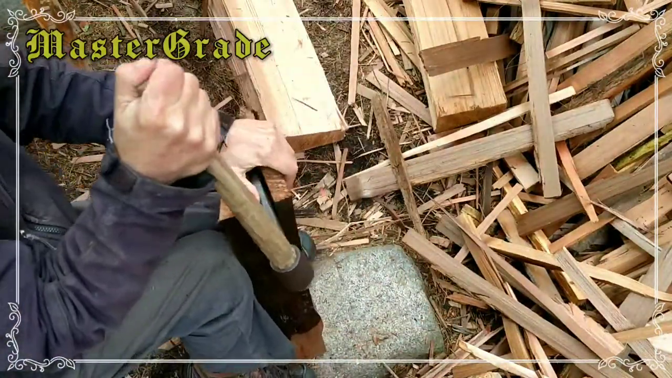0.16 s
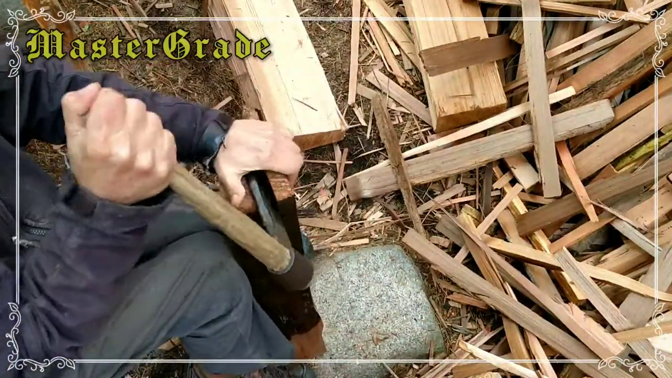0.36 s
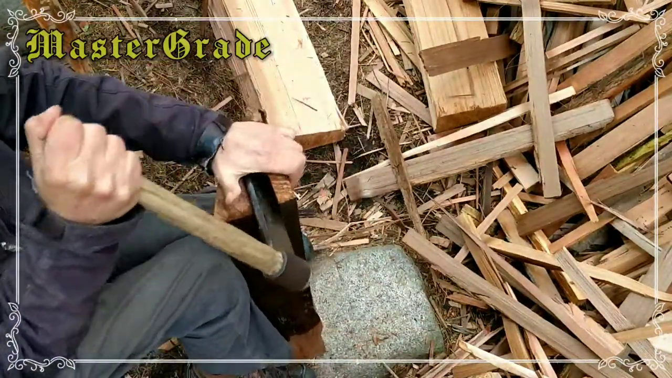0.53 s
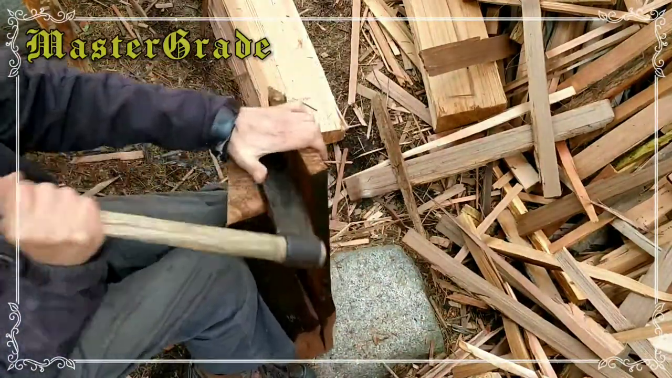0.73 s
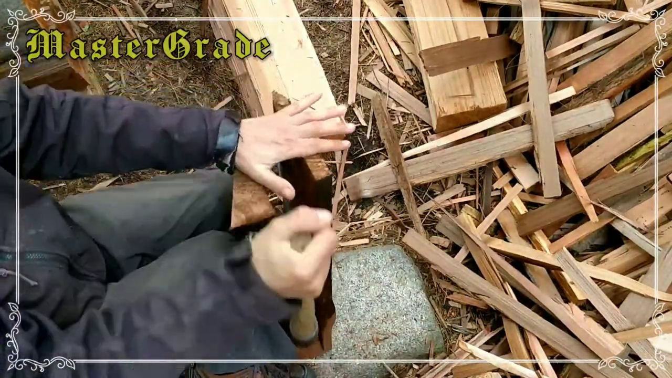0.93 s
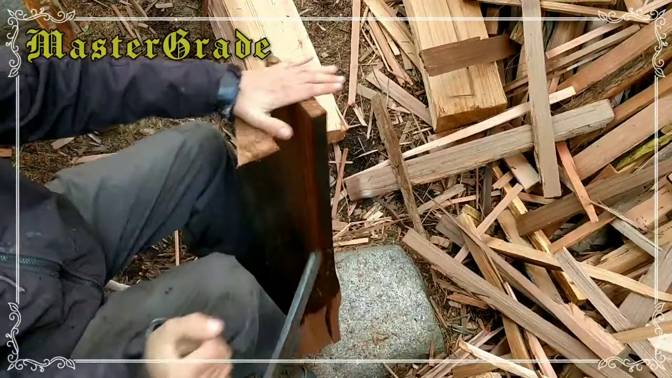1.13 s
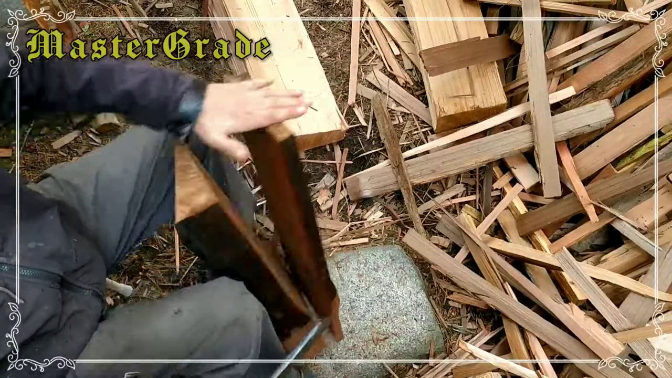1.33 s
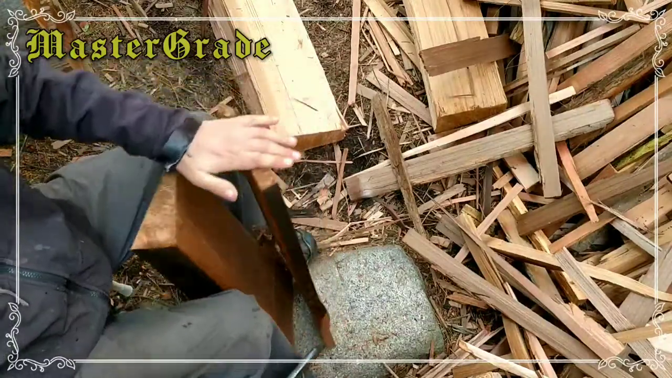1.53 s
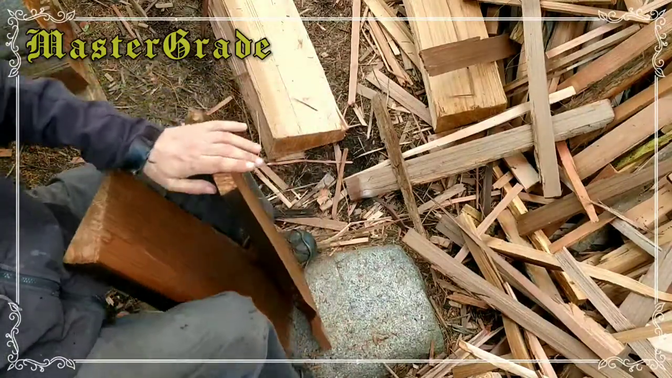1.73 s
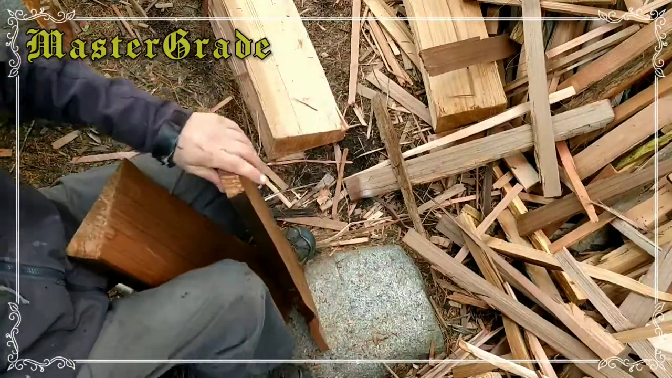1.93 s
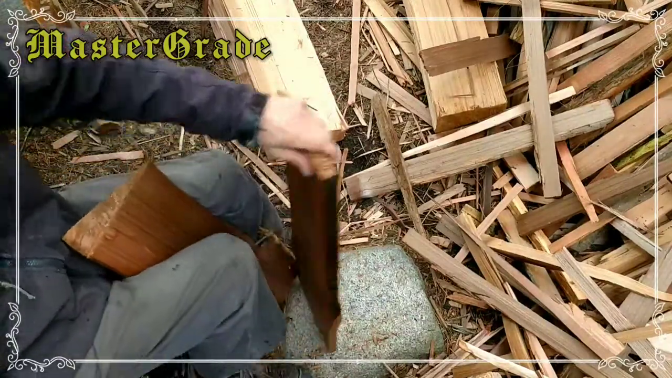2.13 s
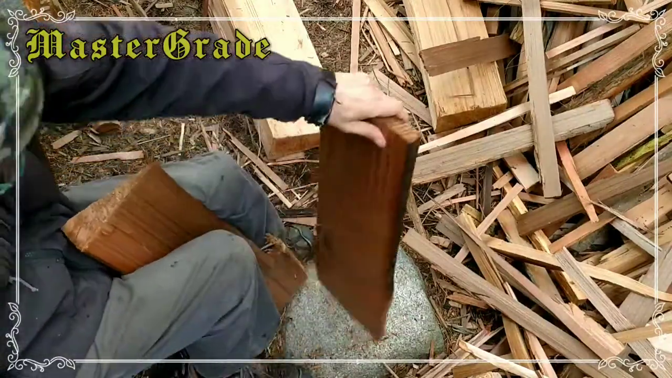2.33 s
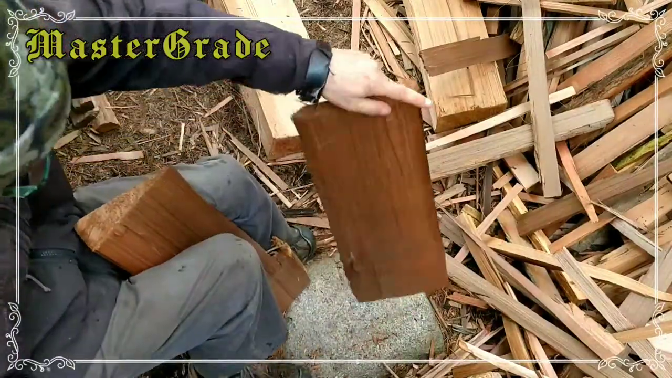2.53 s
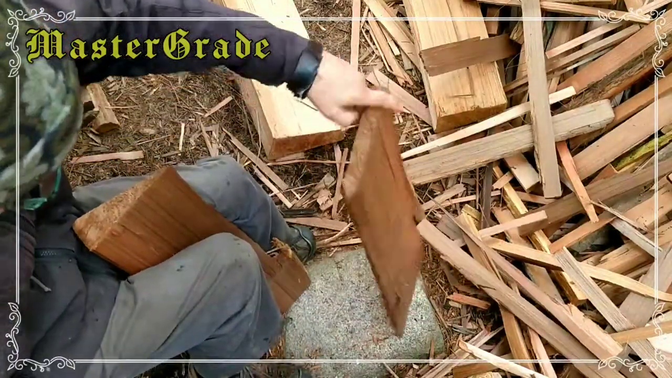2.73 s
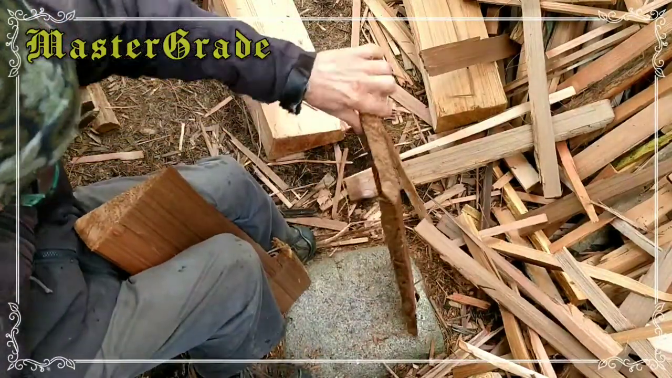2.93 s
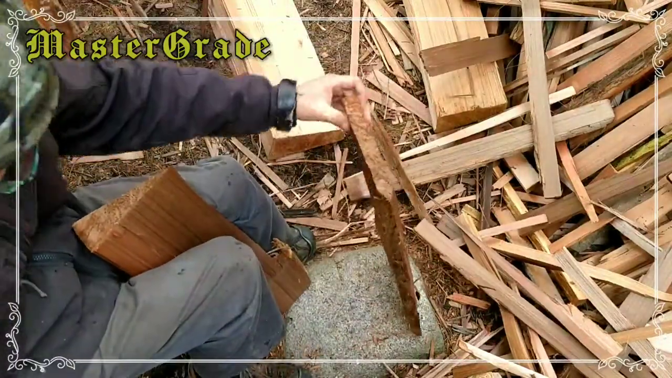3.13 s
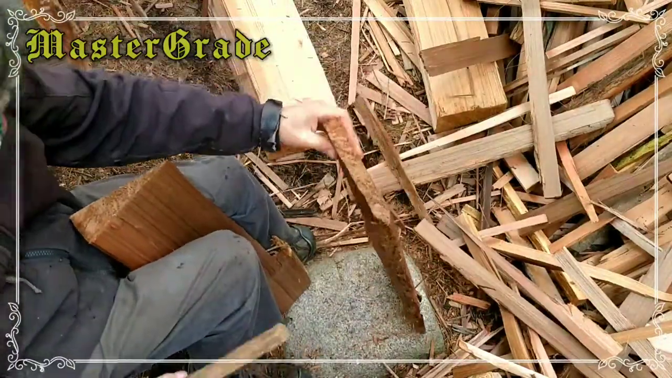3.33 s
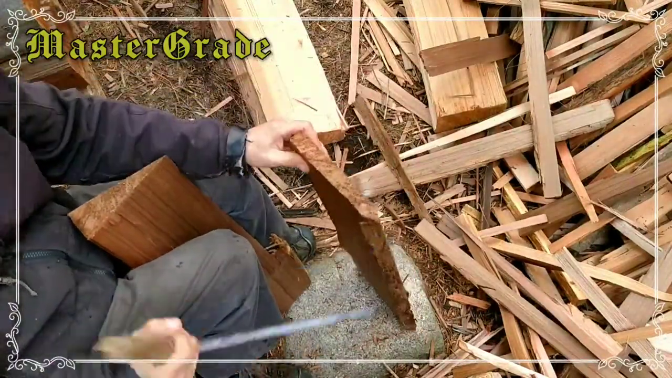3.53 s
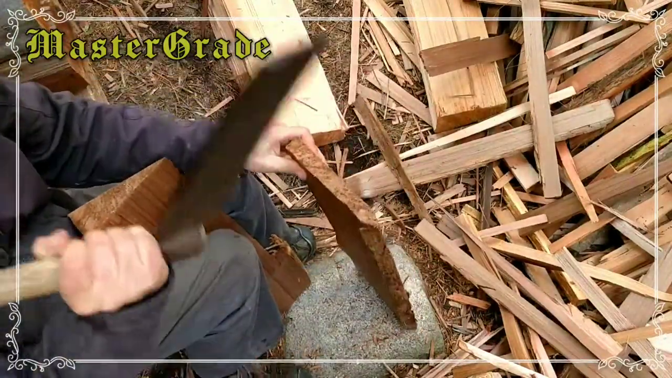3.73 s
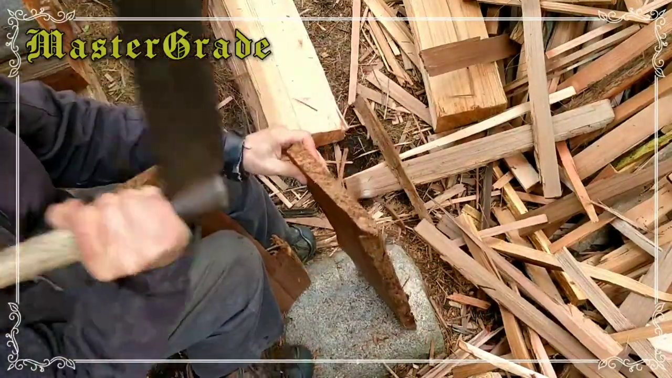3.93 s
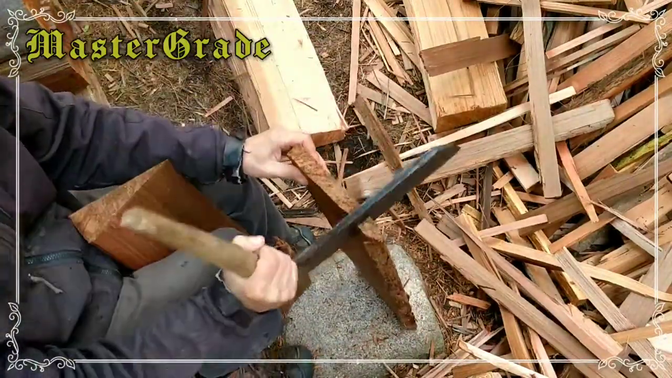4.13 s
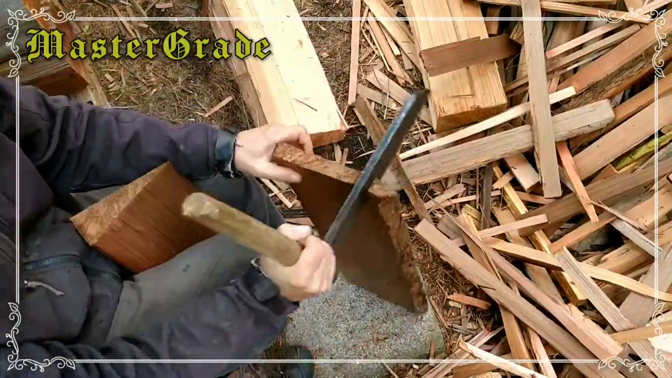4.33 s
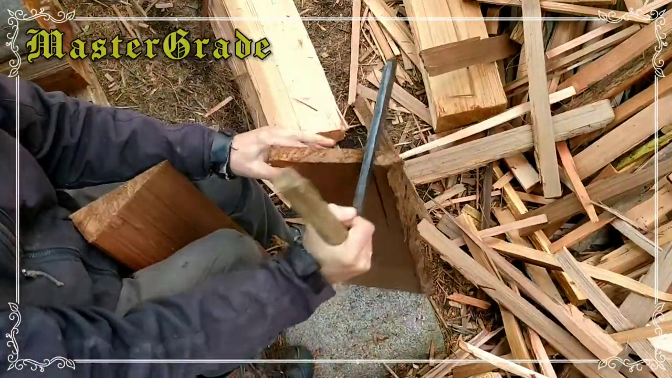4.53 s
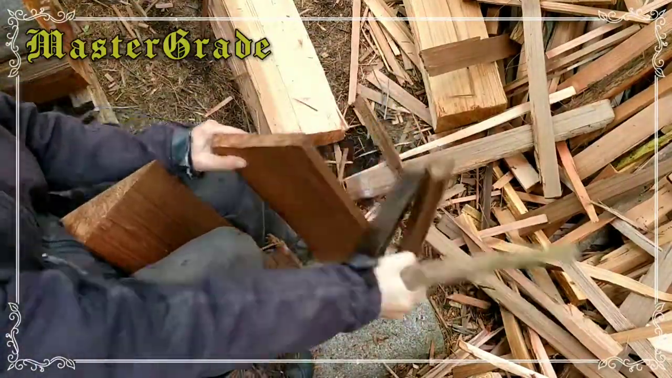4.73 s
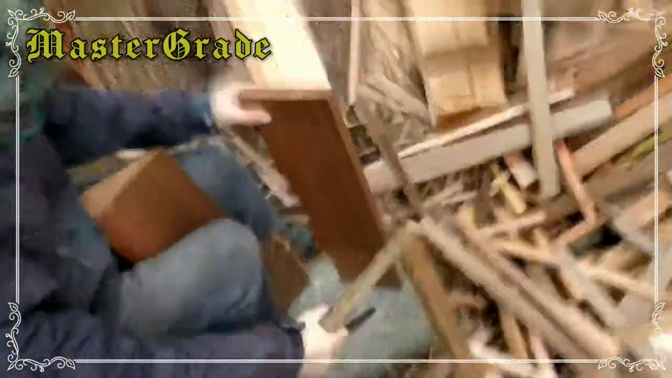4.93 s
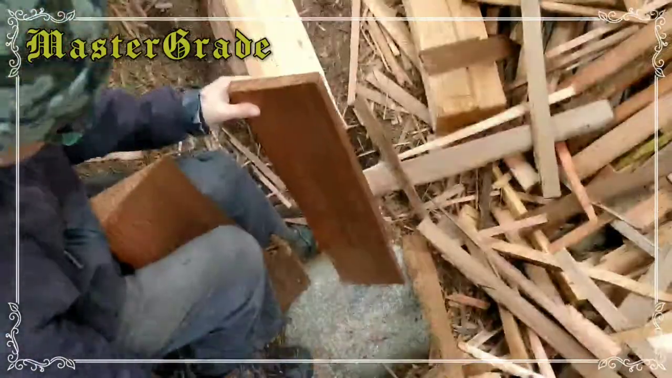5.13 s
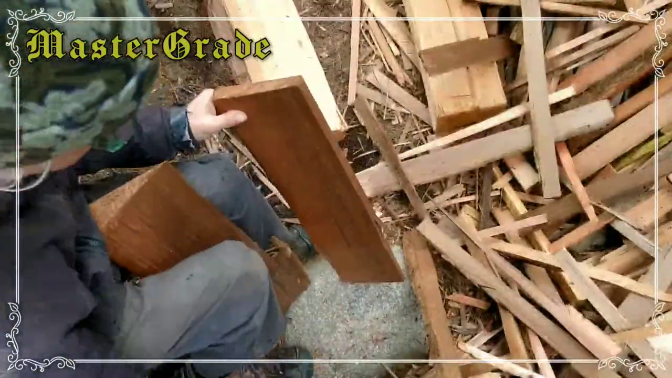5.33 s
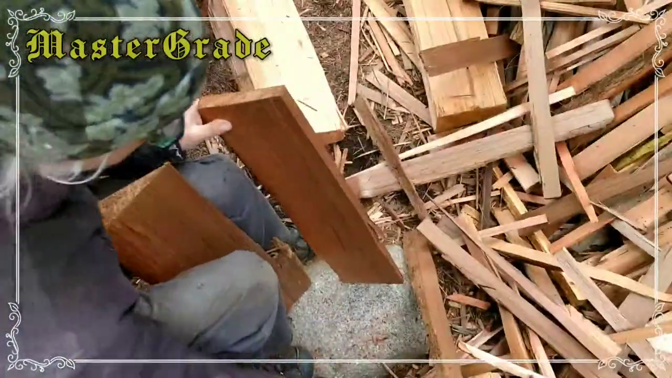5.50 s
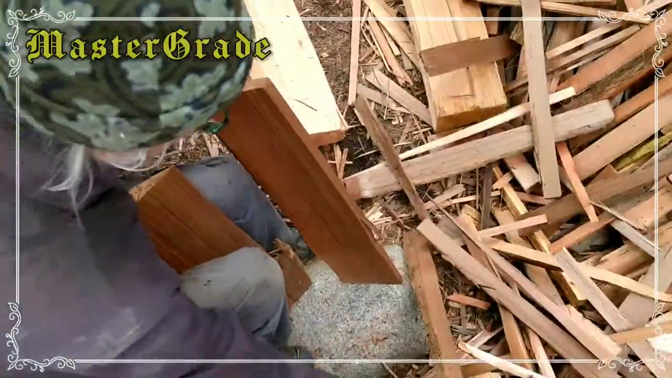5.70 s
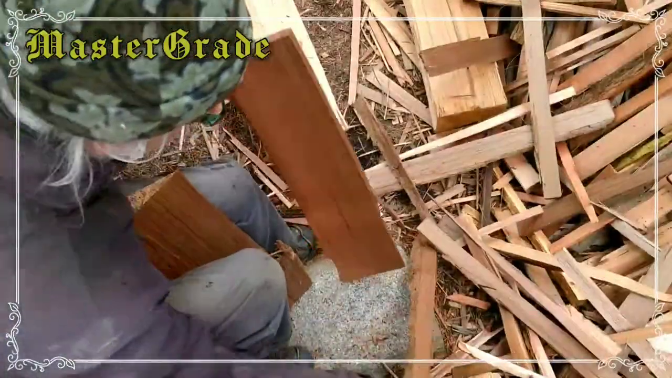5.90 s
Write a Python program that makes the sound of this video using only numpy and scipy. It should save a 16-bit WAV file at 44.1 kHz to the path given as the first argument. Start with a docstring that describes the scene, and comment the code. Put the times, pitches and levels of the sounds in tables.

```python
"""Splitting a cedar shake outdoors, close to a pair of microphone ports. Over a soft rustle of filtered noise,
fibres snap as noise bursts; a mallet drives a froe into a block, heard as clatter with decaying modes.
Wood scrapes in stick-slip noise, chips tick through resonances, and the steel blade rings in sharp modes.
Slow decaying sines follow heavy blows. The shake tears free, is stood on a stone and its edge chopped off;
faint tones glide like a far bird's whistles, then a low hum. Blows leave a faint wash of decaying noise."""
import sys
import numpy as np
from scipy import signal
from scipy.fft import rfft, irfft
from scipy.io import wavfile
from scipy.ndimage import uniform_filter1d

SR = 44100
rng = np.random.default_rng(int(sys.argv[2]) if len(sys.argv) > 2 else 0)


def dump_mix(stems):
    """Bounce the given channels to the path in sys.argv[1] as a 16-bit WAV at rate SR."""
    frames = np.atleast_2d(stems).T  # one column per channel
    limited = np.clip(frames, -1, 1)  # hard clip at full scale
    pcm = np.round(limited * 32767).astype(np.int16)
    wavfile.write(sys.argv[1], SR, pcm)


N = 262826
T = np.arange(SR // 4) / SR  # time for wood to come to rest, s
LONG_T = np.arange(SR) / SR  # time for steel and ground to come to rest, s

# Spectrum of light friction. Each row: frequency in Hz, relative level in dB.
SWISH_SPECTRUM = [(1000, -13.5), (2800, -4), (4400, -0.5), (5800, -4.5), (10000, -4.5), (16000, -8.5)]
# Resonances of a rubbed board. Each row: frequency in Hz, width in Hz, relative level in dB.
BOARD_RESONANCES = [(258, 120, 3.5), (527, 40, 5.5), (760, 97, 0), (1070, 24, 0), (1603, 490, 0),
                    (2270, 49, -9), (2830, 610, -12.5)]
# Resonances of the half-split strip. Each row: frequency in Hz, width in Hz, relative level in dB.
STRIP_RESONANCES = [(1188, 41, -6.5), (1424, 76, -13.5), (1763, 170, -9.5), (1957, 280, -12),
                    (2920, 75.7, -5), (3280, 47, -6)]


def undb(db):
    """Decibels to amplitude gain, on the logarithmic scale of level."""
    return 10 ** (np.asarray(db) / 20)


def fade(t60, t=T):
    """Exponential decay of a damped system, 60 dB down after t60 seconds."""
    return np.exp(-np.log(1000) * t / max(t60, 1e-4))


def unit(x):
    """Normalise the power: scale to rms 1."""
    return x / np.sqrt(np.mean(x ** 2))


def crest(x, size):
    """Short-time power: rms of the loudest stretch of size samples."""
    return np.sqrt(uniform_filter1d(np.mean(x ** 2, axis=0), size).max())


def noise(n, apart):
    """Partly coherent stereo noise; apart is the share of power that the two sides do not have in common."""
    apart = np.clip(apart, 0, 1)
    common = rng.standard_normal(n)
    separate = rng.standard_normal((2, n))
    return np.sqrt(1 - apart) * common + np.sqrt(apart) * separate


def colour(x, points):
    """Minimum-phase filter through (Hz, dB) points, made causal by folding the cepstrum."""
    hz, db = np.transpose(points)
    size = 4096
    grid = np.maximum(np.arange(size // 2 + 1) * SR / size, 1)
    gain = undb(np.interp(np.log(grid), np.log(hz), db))
    cepstrum = irfft(np.log(gain))
    cepstrum[1:size // 2] *= 2
    cepstrum[size // 2 + 1:] = 0
    impulse = irfft(np.exp(rfft(cepstrum)))
    return signal.fftconvolve(x, impulse[None], axes=1)[:, :x.shape[1]]


def resonate(x, peaks):
    """Forced resonance: pass a sound through parallel (Hz, width Hz, dB) resonators."""
    total = 0
    for hz, width, db in peaks:
        total = total + undb(db) * signal.lfilter(*signal.iirpeak(hz, hz / width, fs=SR), x)
    return total


def bounce(x, strength):
    """Early reflection: stone, knees and boards nearby return three echoes, 0.6 to 5.9 ms late."""
    lags = rng.integers(25, 260, size=3)
    echoes = sum(np.pad(x, ((0, 0), (lag, 0)))[:, :x.shape[1]] for lag in lags)
    return x + strength * echoes


def swing(hz, t=T):
    """Interaural phase: a sine whose right side lags the left by 0.5 rad."""
    return np.sin(2 * np.pi * hz * t - np.array([[0], [.5]]))


def ring(modes, detune, t=T):
    """Modal decay: (Hz, dB, t60) modes ring freely; the grip shifts them a little on every blow."""
    total = 0
    for hz, db, t60 in modes:
        shifted_hz = hz * (1 + detune * rng.standard_normal())
        total = total + undb(db) * fade(t60, t) * swing(shifted_hz, t)
    return total


def grains(n, rough_db, size):
    """Stick-slip friction: a gain that jumps every size samples, at rms about 1."""
    steps = undb(rough_db * rng.standard_normal(n // size + 1))
    return unit(np.repeat(steps, size))[:n]


def add(out, s, sound, pan_db=0):
    """Linear superposition: mix a sound in at time s, the left pan_db above the right."""
    i = max(int(s * SR), 0)
    sound = sound * undb(np.array([[pan_db], [-pan_db]]) / 2)
    out[:, i:i + sound.shape[1]] += sound[:, :N - i]


def rustle():
    """Friction noise: cloth, chips and the handled board move with the work, over still outdoor air."""
    # Sleeves, knees and chips. Each row: time in seconds, rumpling and swish in dB before the offsets below.
    movement = [(0.0, -55.5, -41.5), (0.41, -57.5, -41.5), (0.6, -52.5, -42.5), (0.76, -53, -56),
                (1.09, -52.5, -52.5), (1.38, -47.5, -47), (1.63, -62, -59), (1.86, -54, -48.5),
                (2.21, -54, -50.5), (2.67, -58, -52.5), (3.221, -63, -53.5), (3.57, -64.5, -51.5),
                (4.7, -65, -54), (4.861, -49.5, -37.5), (4.98, -65.5, -53), (5.329, -49, -48.5),
                (5.56, -63.5, -58), (5.87, -72, -53.5), (5.96, -70, -53.5)]
    # Each row: frequency in Hz, relative level in dB; first the rumpling, then the air.
    rumple_spectrum = [(100, -6), (260, -4.5), (600, -0.5), (1000, -1), (1800, -9), (6000, -25.5)]
    air_spectrum = [(20, -2), (50, -3.5), (80, -5), (130, -22.5), (300, -22.5), (1000, -38), (4000, -45.5),
                    (16000, -49)]
    rumple_offset_db, swish_offset_db, air_db = 3.5, -0.5, -52
    t = np.arange(N) / SR
    s, *columns = np.transpose(movement)
    rumple_db, swish_db = (np.interp(t, s, c) for c in columns)
    folds = uniform_filter1d(grains(N, rough_db=2.0, size=700), size=900)
    friction = noise(N, 0.47) * grains(N, rough_db=3, size=130)
    cloth = unit(colour(friction, rumple_spectrum))
    board = unit(resonate(friction, BOARD_RESONANCES))
    rumple = undb(-2.0) * cloth + undb(-11.5) * board
    swish = unit(colour(noise(N, 0.96) * grains(N, rough_db=1, size=150), SWISH_SPECTRUM))
    air = unit(colour(noise(N, 0.078), air_spectrum))
    rumpling = undb(rumple_db + rumple_offset_db) * rumple
    swishing = undb(swish_db + swish_offset_db) * swish
    return folds * (rumpling + swishing) + undb(air_db) * air


def snaps():
    """Brittle fracture: a fibre gives, then breaks; splinters follow, block and split strip answer."""
    # Each row: time of the break in seconds, snap level in dB before the tick gain,
    # splinter tail in dB beside the break, level of the strip's ring in dB.
    fractures = [(0.0377, -12.5, -18, -31.5), (0.077, -24, -34, -36), (0.081, -3.5, -20.5, -51),
                 (0.1225, -18, 7, -33), (0.188, -15, -13, -31.5), (0.343, -19, -25, -23),
                 (0.5797, -4, -8, -19.5), (0.713, -11, -33, -22), (0.7346, -1.5, -18, -36),
                 (0.7475, -14, -24, -41), (0.7698, 2, -38, -37), (0.8179, -6.5, -34, -53),
                 (1.443, -13, -21, -40), (1.453, -9, -29, -32.5), (1.4638, -11, -2, -26.5),
                 (1.4764, -15, -8, -35), (1.5197, -5, -26, -50), (1.535, -14.5, -13, -49),
                 (1.5553, -6.5, -37, -49), (1.579, -9.5, -46, -31.5), (1.654, -29, -15, -58),
                 (1.7002, -26, -30, -73), (1.7462, -15.5, -33, -38), (1.773, -24, -6, -39.5),
                 (1.811, -16, -1, -35), (1.8752, -15.5, -19, -37), (2.128, -19, -14, -40),
                 (2.156, -10, 11, -50), (2.17, -6.5, 3, -44), (2.174, -11, 7, -42), (2.179, -3.5, 4, -52),
                 (2.189, -5.5, -25, -39), (4.172, 4, -17, -25), (4.6956, 1.5, 1.5, -35.5),
                 (4.7082, -3, -4, -36), (4.727, -1, -1, -39), (4.9088, -11, -2, -26),
                 (5.297, -23.5, -12, -32)]
    # Each row: frequency in Hz, relative level in dB; first the snap, then the body around it.
    snap_spectrum = [(500, -13), (2000, -31), (3400, -6.5), (4400, 3), (5600, 1.5), (10000, 4), (16000, 2)]
    body_spectrum = [(50, -34), (150, -11.5), (500, 5), (1100, 6.5), (1800, -3), (3000, -1.5), (6000, -29)]
    snap_t60_s, lead_s, tick_gain_db = .005, .003, -5.5
    # the wood around a snap answers, growing more steeply than the snap itself
    body_db, body_per_db = -27.5, 1.25
    out = np.zeros((2, N))
    for s, db, tail_db, strip_db in fractures:
        splinters = np.repeat(undb(6 * rng.standard_normal(len(T)) - 2), 22)[:len(T)]
        tail = undb(tail_db) * splinters * fade(0.059) + undb(-45.0) * fade(0.18)
        shape = fade(snap_t60_s) + tail
        give = undb(-20) * np.linspace(0, 1, int(lead_s * SR)) ** 2
        burst = noise(len(give) + len(T), 0.38) * np.r_[give, shape]
        tick = bounce(colour(burst, snap_spectrum), strength=0.13)
        knock = noise(len(T), 0.37) * fade(0.081)
        body = bounce(colour(knock, body_spectrum) + resonate(knock, BOARD_RESONANCES), strength=1.0)
        strip = resonate(noise(len(T), 0.2) * fade(0.021), STRIP_RESONANCES)
        tick_pan_db = 1 + 0.51 * rng.standard_normal()
        add(out, s - lead_s, undb(db + tick_gain_db) * tick / crest(tick, size=64), tick_pan_db)
        answer = undb(body_db + body_per_db * db) * body / crest(body, size=64)
        answer = answer + undb(strip_db) * strip / crest(strip, size=64)
        add(out, s, answer, 1.5)
    return out


def scrapes():
    """Stick-slip excitation: rough faces slide in swelling strokes; the board resonates, fibres crackle."""
    # Wood on wood, steel or stone. Each row: start in seconds, length in seconds, body level in dB,
    # crackle in dB beside the body, note favoured by the contact in Hz.
    strokes = [(0.337, 0.032, -38, 16.5, 875), (0.363, 0.011, -23, -2, 513), (0.377, 0.095, -44.5, 13, 670),
               (0.505, 0.089, -50, -9, 240), (0.57, 0.11, -37, 4, 860), (0.656, 0.029, -22, -3, 298),
               (0.818, 0.12, -52, -5, 756), (0.97, 0.12, -46.5, -17, 220),
               (1.14, 0.053, -41.5, -10.5, 1560), (1.33, 0.018, -33.5, 1, 890),
               (1.35, 0.046, -40, -26, 1300), (1.41, 0.092, -41.5, 1, 1190), (2.047, 0.025, -44, -1, 805),
               (2.153, 0.054, -34.5, -3, 670), (2.21, 0.055, -43, 0, 201), (2.293, 0.067, -37, -13, 284),
               (2.328, 0.073, -36, -14, 510), (2.375, 0.054, -47.5, -7, 330), (2.428, 0.2, -49.5, -4, 1066),
               (2.689, 0.051, -42.5, -28, 1580), (2.872, 0.105, -50, -18, 740),
               (3.237, 0.031, -55.5, -8.5, 864), (3.369, 0.15, -57, -14, 420),
               (3.549, 0.14, -62.5, 14.5, 1000), (4.221, 0.26, -58, 3, 970),
               (4.627, 0.11, -48.5, 7.5, 1080), (4.688, 0.025, -16, 3, 990), (4.733, 0.087, -57, 19, 580),
               (4.812, 0.033, -39.5, -2.5, 288), (4.991, 0.052, -30.5, 1.5, 1030),
               (5.42, 0.11, -61.5, 12.5, 710)]
    note_width_hz, note_db = 130, 10.5
    out = np.zeros((2, N))
    for s, length, db, treble_db, note_hz in strokes:
        n = max(int(length * SR), 256)
        pressure = grains(n, rough_db=2, size=300) * signal.windows.tukey(n, .8)
        slip = pressure * grains(n, rough_db=3.5, size=30)
        slip = np.pad(slip, (0, len(T)))  # room for the resonances to die away
        crackle = pressure * grains(n, rough_db=5, size=16) * grains(n, rough_db=4, size=130)
        crackle = np.pad(crackle, (0, len(T)))
        peaks = BOARD_RESONANCES + [(note_hz, note_width_hz, note_db)]
        body = resonate(noise(len(slip), 0.051) * slip, peaks)
        fibres = bounce(colour(noise(len(crackle), 0.88) * crackle, SWISH_SPECTRUM), strength=0.55)
        rub = body / crest(body, size=n) + undb(treble_db) * fibres / crest(fibres, size=n)
        add(out, s, undb(db) * rub, 1.5)
    return out


def knocks(rows, modes, gain_db, usual_ring_db, note_db, detune):
    """Impact excitation: dense, fast-dying clatter plus modes; grip and footing favour one note."""
    # Edges in Hz of the five adjoining registers.
    register_edges = [25, 120, 390, 1350, 6000, 17000]
    # a heavy contact reaches the deep thump faster than the hollow lows; a hard one also splinters
    thump_db, thump_per_weight, splinter_db = -21, 1.7, -9
    # wood that is held loosely rings longer and more purely
    ring_db_per_doubling, usual_t60_s = 15, .06
    scatter_db, scatter_t60_s = -27, .24
    attack_s = 0.00043  # time constant
    steepness = [3, 3, 6, 3, 3]  # filter order of each register
    out = np.zeros((2, N))
    for s, db, weight, hardness, t60, note_hz in rows:
        note = undb(note_db) * fade(1.99 * t60) * swing(note_hz)
        ring_db = usual_ring_db + ring_db_per_doubling * np.log2(max(t60, 1e-3) / usual_t60_s)
        tone = undb(ring_db) * (ring(modes, detune) + note)
        scatter = undb(scatter_db) * fade(scatter_t60_s)  # thrown back by the woodpile
        attack = 1 - np.exp(-T / attack_s)
        # each register: level in dB, decay against t60, share unlike between the ports
        registers = [(thump_db + thump_per_weight * weight, 1.2, .15),  # thump
                     (weight, .9, .08),  # hollow
                     (0, .9, .1),  # knock
                     (hardness, .8, .35),  # clack
                     (hardness + splinter_db, .65, .5)]  # splinter
        for k, (band_db, hold, apart) in enumerate(registers):
            clatter = bounce(noise(len(T), apart) * (fade(t60 * hold) + scatter), strength=0.85)
            struck = attack * (clatter / 2 + tone)
            band = signal.butter(steepness[k], register_edges[k:k + 2], "band", fs=SR, output="sos")
            part = signal.sosfilt(band, struck)
            add(out, s, part / crest(part, size=400) * undb(db + band_db + gain_db), .8)
    return out


def block_blows():
    """Modal excitation of a massive body: blows on the block."""
    # Each row: time in seconds, level in dB before gain_db, weight of the lows in dB,
    # hardness of the contact in dB, base t60 in seconds (scaled per register), favoured note in Hz.
    block_rows = [(0.3735, -8, -6.5, 1, 0.034, 526), (0.672, -6, -8, -5, 0.067, 683),
                  (0.6995, -5, -20, -14, 0.043, 907), (0.77, -33.5, -14, 15, 0.022, 840),
                  (0.887, -57.5, 19, -10, 0.066, 454), (1.015, -36.5, 10.5, -25, 0.0087, 417),
                  (1.105, -33.5, -11, -5.5, 0.057, 830), (1.183, -39, -4, 3.5, 0.042, 870),
                  (1.34, -19.5, -5.5, -24, 0.1, 461.6), (1.371, -20, -5.5, -29, 0.049, 533),
                  (1.562, -39, 8, -2, 0.087, 444), (1.866, -34, 7, 1.5, 0.036, 460),
                  (2.187, -30.5, 6, -1, 0.091, 755)]
    # Each row: mode frequency in Hz before detuning, relative level in dB, t60 in seconds.
    block_modes = [(267, -5.5, 0.024), (344, -8, 0.12), (473, 6.5, 0.038), (733, -8.5, 0.13),
                   (837, 0, 0.099), (943, -0.5, 0.084), (1100, -8, 0.04), (1280, -4.5, 0.011)]
    return knocks(block_rows, block_modes, gain_db=-1.5, usual_ring_db=-17, note_db=2, detune=.006)


def yard(x):
    """Diffuse reverberation: trees and stacked wood return a faint, smooth wash of the blows."""
    # Each row: frequency in Hz, relative level in dB.
    yard_spectrum = [(100, -18.5), (400, -7.5), (900, -5.5), (2000, -6), (3600, -2), (5800, 4), (8000, 0),
                     (15000, -18)]
    wash_db, t60_s, build_s = -21.5, 0.57, 0.0064
    decay = undb(-60 * LONG_T / t60_s)
    build = 1 - np.exp(-LONG_T / build_s)
    wash = noise(SR, .9) * decay * build
    wash = colour(wash / np.sqrt(np.sum(wash[0] ** 2)), yard_spectrum)
    mono = x.mean(axis=0)[None]
    return undb(wash_db) * signal.fftconvolve(mono, wash, axes=1)[:, :N]


def chips(count):
    """Resonant impact: loose chips and fibres tick as wood is shifted, each at its own pitch."""
    # Each row: start in seconds, end in seconds, upper limit of the tick level in dB.
    shifts = [(.4, .67, -31), (.85, 1.33, -39), (4.74, 4.89, -36)]
    spread_db = 12
    out = np.zeros((2, N))
    for start, end, top_db in shifts:
        for when, size, pitch in rng.random((count, 3)):
            ratio = 2 ** (1.5 * pitch - .5)  # half an octave down to one octave up
            peaks = [(hz * ratio, width, db) for hz, width, db in STRIP_RESONANCES]
            tick = resonate(noise(len(T), .3) * fade(0.012), peaks)
            level = undb(top_db - spread_db * size)
            add(out, start + (end - start) * when, level * tick / crest(tick, size=64))
    return out


def blade():
    """Damped modal vibration: the steel froe rings after contact; hand or wood shortens its decay."""
    # Each row: time in seconds, gain in dB, pitch favoured by the contact point in Hz,
    # share of the free ring time.
    taps = [(1.182, -39.5, 251, 0.2), (2.661, -28.5, 396, 0.48), (4.699, -17.5, 1040, 0.23),
            (4.91, -26, 560, 0.54), (5, -19.5, 560, 0.87), (5.217, -17, 2830, 0.45)]
    # Each row: mode frequency in Hz before detuning, relative level in dB, free t60 in seconds.
    steel_modes = [(207, 13, .68), (395, -13, .28), (425, -18, 1.7), (535, -5, .33), (750, -14, .3),
                   (1023, 2, .38), (1114, -9, .25), (1600, -12, .22), (1841, -13, .25), (2103, 0, .17),
                   (2108, -7, .55), (2353, -16, .4), (2740, -10, .17), (3347, -3, .26), (4270, 3, .11),
                   (5873, 8, .11), (6640, -6, .1)]
    out = np.zeros((2, N))
    for s, db, favoured_hz, free in taps:
        modes = []
        for hz, mode_db, t60 in steel_modes:
            # modes far from the favoured pitch are barely excited
            octaves = min(abs(np.log2(hz / favoured_hz)), 2.8)
            modes.append((hz, mode_db - 11 * octaves, t60 * free))
        hiss = colour(noise(len(LONG_T), 0.68), SWISH_SPECTRUM)
        contact = undb(-18) * favoured_hz / 1000 * fade(0.077, LONG_T) * hiss
        add(out, s, undb(db) * (ring(modes, detune=0.00088, t=LONG_T) + contact))
    return out


def thuds():
    """Damped oscillation: heavy blows shake the ground and push air past the ports, each at its own phase."""
    # Each row: start in seconds, frequency in Hz, t60 in seconds, level in dB,
    # left minus right in dB, phase of the right port against the left in radians.
    sways = [(1.869, 138, 0.041, -17.5, -2, -1), (1.872, 59.5, 0.1, -18.5, -1, -0.3),
             (2.733, 53, 0.5, -33, 2.5, -5.5), (3.585, 158, 0.024, -5.5, 4, -0.5),
             (4.176, 55, 0.34, -23, -1, 0), (5, 168, 0.066, 3.5, -3, -2.5), (5.013, 25, 0.33, -8, -11.5, 3),
             (5.05, 39, 0.71, -24.5, -3.5, 6), (5.302, 130, 0.026, -5.5, -3.5, 0.5),
             (5.305, 74, 0.12, -15.5, -0.5, 0.5)]
    out = np.zeros((2, N))
    for s, hz, t60, db, pan_db, phase in sways:
        onset = 1 - fade(0.026, LONG_T)
        sway = np.sin(2 * np.pi * hz * LONG_T + np.array([[0], [phase]])) * onset
        add(out, s, undb(db) * fade(t60, LONG_T) * sway, pan_db)
    return out


def shake_knocks():
    """Modal excitation of a light body: knocks on the loose shake."""
    # Each row: time in seconds, level in dB before gain_db, weight of the lows in dB,
    # hardness of the contact in dB, base t60 in seconds (scaled per register), favoured note in Hz.
    shake_rows = [(2.659, -20.5, -15, -13.5, 0.055, 1024), (2.729, 1, -10, -22.5, 0.054, 540),
                  (2.7615, -15.5, -2, -19, 0.048, 1088), (3.174, -38, -1.5, -11, 0.082, 737),
                  (3.586, -24.5, 8.5, -25.5, 0.052, 1004), (3.601, -32.5, 12, -19.5, 0.06, 655),
                  (4.166, -12, 4.5, 8, 0.031, 327), (4.464, -35, 2, -10, 0.036, 1084),
                  (4.698, -6, -23.5, -7, 0.044, 1059), (4.712, -23.5, 8, 11.5, 0.026, 312),
                  (4.877, -46, 19.5, 5, 0.035, 345), (4.908, -30, 3.5, 11, 0.027, 1010),
                  (4.999, -6, -4.5, 1, 0.035, 870), (5.054, -22, 5.5, -1, 0.0097, 550),
                  (5.097, -39.5, 18, -12, 0.0042, 547), (5.316, -15, -3, -11.5, 0.039, 665),
                  (5.412, -43, 19.5, -17, 0.036, 492), (5.519, -37.5, 0, -17, 0.054, 683)]
    # Each row: mode frequency in Hz before detuning, relative level in dB, t60 in seconds.
    shake_modes = [(183, -13, 0.086), (312.8, -3, 0.045), (550, -7, 0.14), (602, -9, 0.14),
                   (750, -11, 0.16), (899, -4.5, 0.11), (1077, 5, 0.068), (1242, -10, 0.053),
                   (1637, 2, 0.095), (2253, 8.5, 0.068)]
    return knocks(shake_rows, shake_modes, gain_db=-6.0, usual_ring_db=-13, note_db=6, detune=.004)


def glides():
    """Frequency modulation: faint, slightly rough tones swell and slide from one pitch to another."""
    # A far bird's whistles and a low hum. Each row: start in seconds, length in seconds,
    # first pitch in Hz, last pitch in Hz, peak level in dB.
    tones = [(3.02, .28, 4450, 3850, -58), (3.33, .12, 4400, 4800, -52), (3.44, .14, 4600, 3850, -52),
             (3.52, .16, 4450, 5100, -52), (3.66, .12, 4700, 4300, -55), (3.69, .47, 1420, 1390, -63),
             (3.76, .13, 4800, 3950, -52), (3.82, .09, 4750, 4350, -55), (3.93, .1, 4400, 4850, -51),
             (4.05, .1, 4750, 3850, -53), (4.272, .06, 305, 340, -46), (4.322, .04, 285, 265, -41)]
    waver_share = .021  # rms share of the pitch
    out = np.zeros((2, N))
    for s, length, from_hz, to_hz, db in tones:
        n = max(int(length * SR), 256)
        lowpass = signal.butter(2, 150, fs=SR, output="sos")
        waver = unit(signal.sosfilt(lowpass, rng.standard_normal(n)))
        pitch_hz = np.linspace(from_hz, to_hz, n) * (1 + waver_share * waver)
        phase = 2 * np.pi * np.cumsum(pitch_hz) / SR
        add(out, s, undb(db) * signal.windows.tukey(n, .7) * np.sin(phase))
    return out


def scene():
    """Superposition of all the sources; only the blows and the blade feed the wash."""
    blows = block_blows() + shake_knocks() + blade()
    handling = snaps() + scrapes() + chips(count=12)
    return blows + yard(blows) + handling + glides() + thuds() + rustle()


def record(dry):
    """Transduction: two ports colour the treble, the left hears first, and the hardest blows overload."""
    # Each row: frequency in Hz, left response in dB, right response in dB.
    port_response = np.array([(2780, 1, 0.5), (6140, 0, 1), (7580, -3, 0), (8660, -9.5, -11),
                              (10370, 3, -2.5), (11600, 8, -7), (14380, 6, -2), (15460, -2.5, -25)])
    top_hz = 15450
    left, right = (colour(dry[k:k + 1], port_response[:, [0, k + 1]])[0] for k in range(2))
    right = np.pad(right, (3, 0))[:N]  # 3 samples later
    loud = np.clip([left, right], -1, 1)
    lowpass = signal.ellip(8, .2, 60, top_hz, fs=SR, output="sos")
    return signal.sosfilt(lowpass, loud)


dry = scene()
out = record(dry)
dump_mix(out)
```